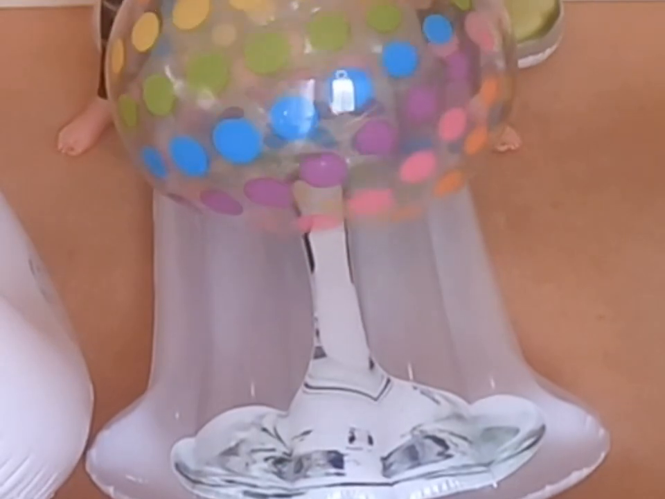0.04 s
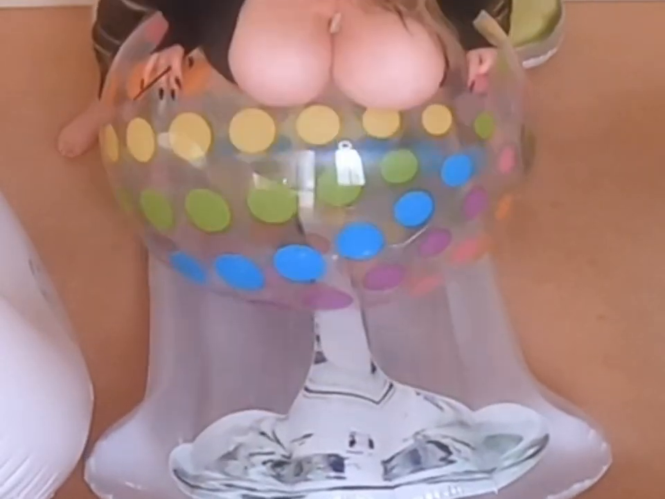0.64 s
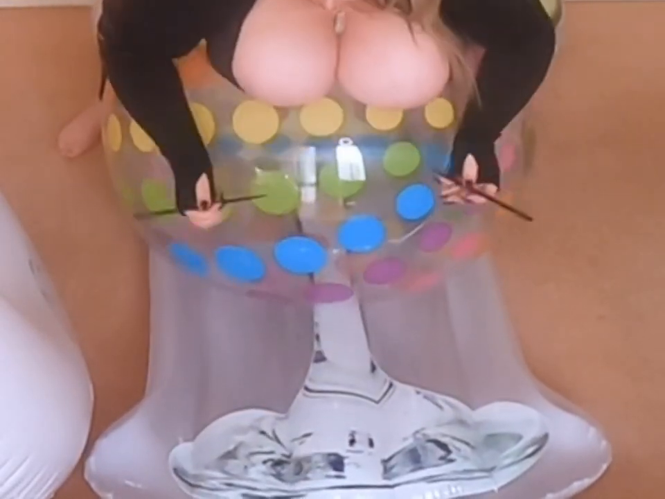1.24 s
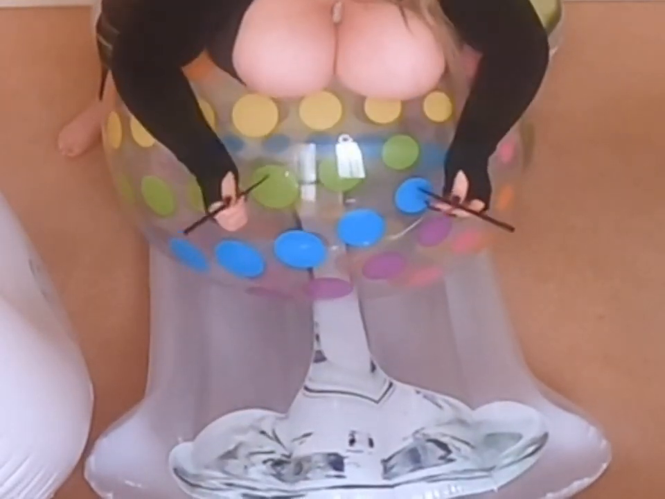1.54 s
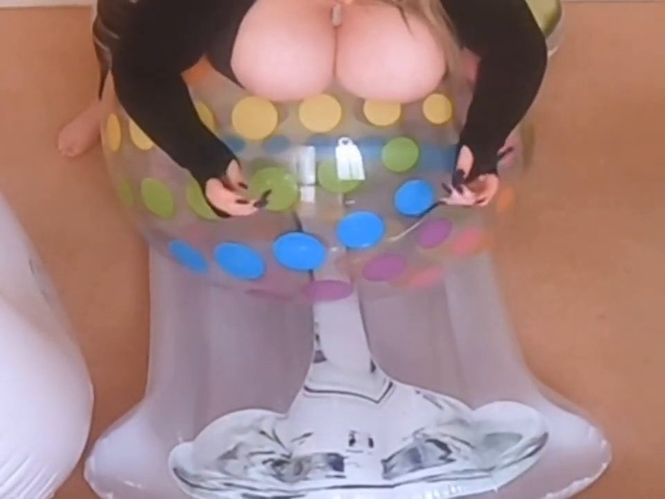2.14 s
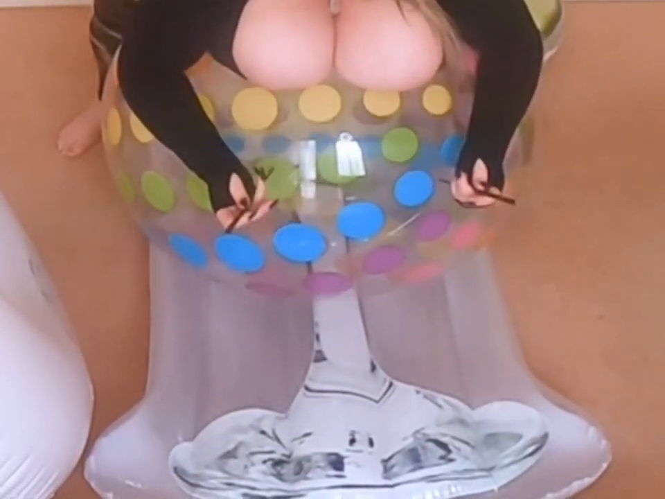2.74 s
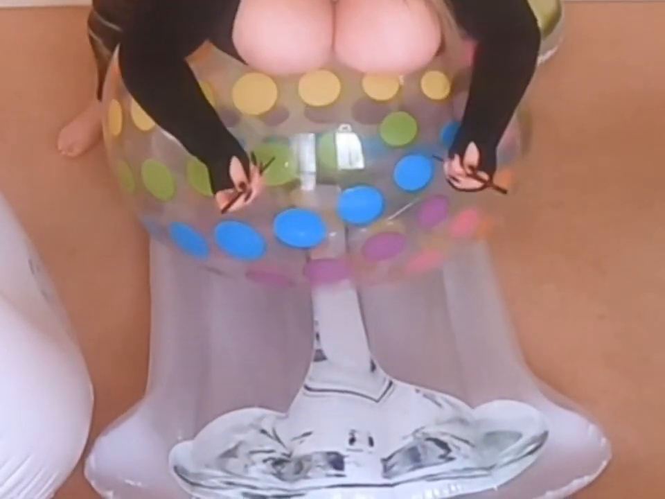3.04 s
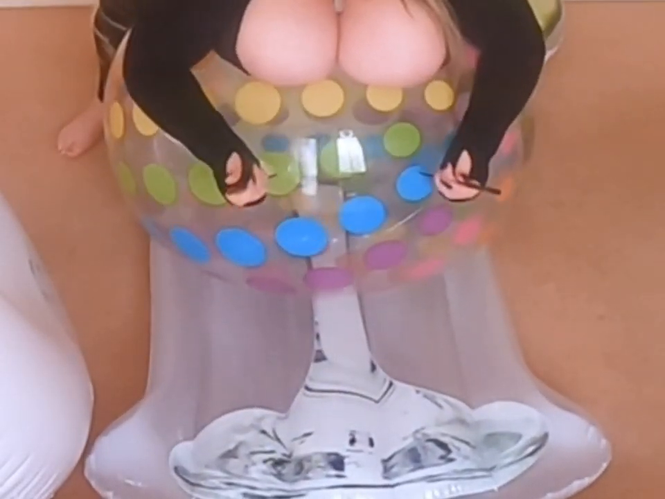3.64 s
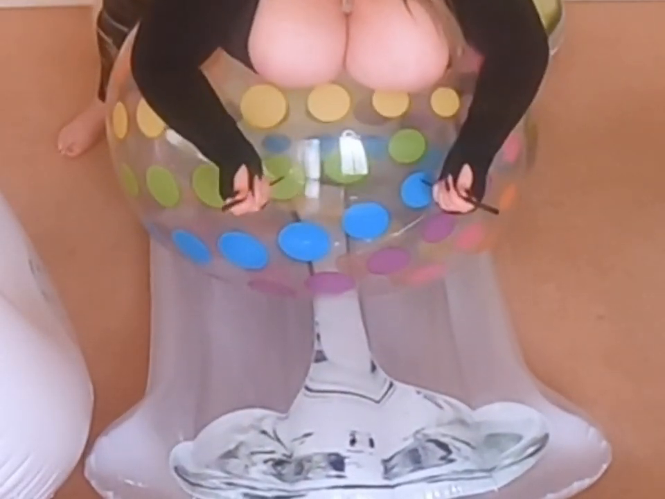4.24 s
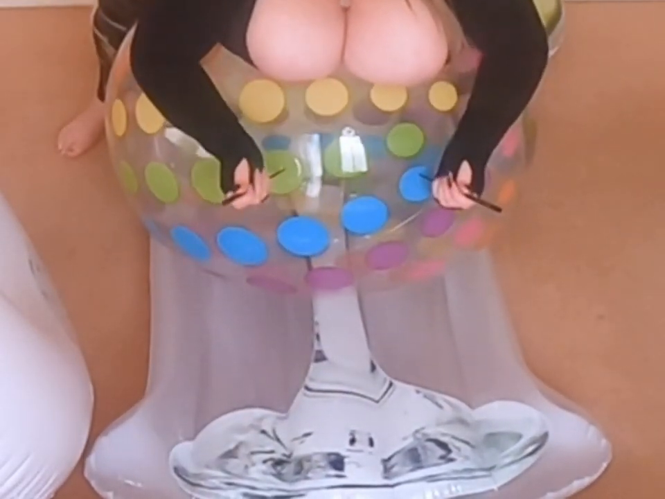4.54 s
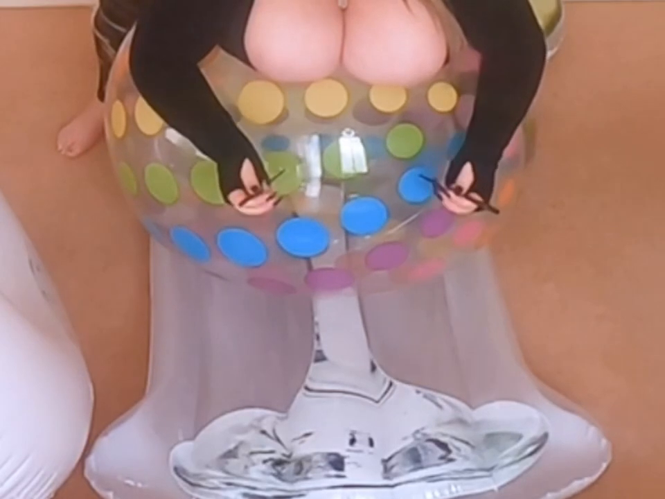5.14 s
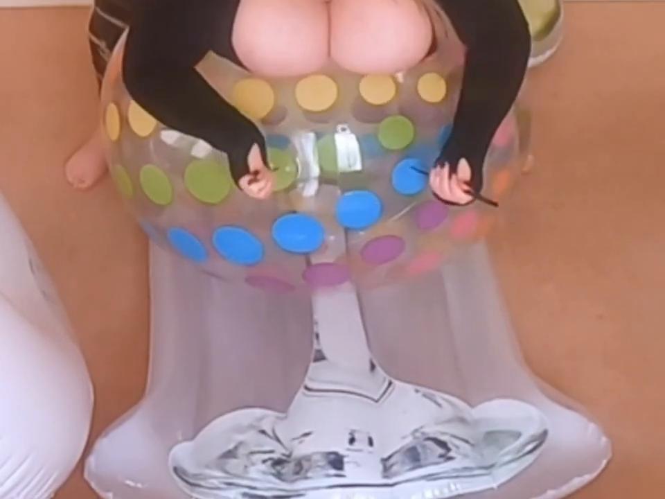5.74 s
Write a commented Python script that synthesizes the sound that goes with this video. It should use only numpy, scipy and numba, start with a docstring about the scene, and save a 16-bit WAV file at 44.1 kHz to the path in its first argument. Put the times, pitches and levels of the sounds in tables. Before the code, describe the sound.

In a small room, a close microphone picks up sticks and hands rubbing an inflated vinyl ball, rasping and faintly squeaking. Bouncing taps come early, and a single hard slap with a hollow boom lands about halfway. The scraping goes on softly until a very loud, slightly distorted double strike and a few lighter jabs, ending in another rasp.

```python
"""A dry rasp with thin squeaks comes first: two chopsticks dragged over a big, taut vinyl inflatable
in a small hard room. Stick-slip friction makes the tips rasp and the skin creak under the hands.
Now and then a jab excites the skin impulsively, and the modes of the enclosed air answer with a boom.
The hardest jabs overload the microphone."""
import sys
import numpy as np
from scipy import signal
from scipy.fft import rfft, irfft
from scipy.io import wavfile
from scipy.ndimage import uniform_filter1d
from numba import njit

SR = 44100
rng = np.random.default_rng(int(sys.argv[2]) if len(sys.argv) > 2 else 0)


def to_wav(sig):
    """Store sig (one row per channel, or 1-D mono) as 16-bit WAV at the path in sys.argv[1].

    Samples outside -1..1 are clipped; the rate is SR.
    """
    pcm = np.clip(np.atleast_2d(sig), -1, 1) * 32767
    pcm = np.round(pcm).astype(np.int16)
    wavfile.write(sys.argv[1], SR, pcm.T)  # frames by channels


N = 263277
T = np.arange(N) / SR
RING_T = T[:SR]  # one second for an event to die away


def undb(db):
    """Decibels to amplitude ratio."""
    return 10 ** (np.asarray(db) / 20)


def unit(x):
    """Normalisation to rms 1."""
    return x / np.sqrt(np.mean(x ** 2))


def fade(t60_s):
    """Free exponential decay, 60 dB in t60_s."""
    return np.exp(-np.log(1000) * RING_T / t60_s)


def build_up(rise_s):
    """First-order growth from 0 towards 1."""
    return 1 - np.exp(-RING_T / rise_s)


def swell(peak_s, rise_s, fall_s):
    """Amplitude envelope of one movement: it builds to a crest of 1 and eases off."""
    away = np.maximum((peak_s - T) / rise_s, (T - peak_s) / fall_s)
    return np.exp(-np.abs(away) ** 1.4)  # exponent 1 gives a pointed crest, 2 a round one


def octaves(size):
    """Logarithmic frequency: octaves above 1 kHz of each spectral bin."""
    return np.log2(np.maximum(np.fft.rfftfreq(size, 1 / SR), 1) / 1000)


def response(points, size):
    """Magnitude response through (frequency_hz, level_db) points."""
    hz, db = np.transpose(points)
    return undb(np.interp(octaves(size), np.log2(hz / 1000), db))


def colour(x, points):
    """Spectral shaping by a magnitude response, at rms 1."""
    return unit(irfft(rfft(x) * response(points, len(x)), len(x)))


def cut(x, order, edge_hz, keep):
    """Maximally flat filter that keeps the "low" or the "high" side."""
    return signal.sosfilt(signal.butter(order, edge_hz, keep, fs=SR, output="sos"), x)


def add(out, start_s, x):
    """Superposition of x on out from start_s."""
    i = int(start_s * SR)
    out[i:i + len(x)] += x[:N - i]


def walk(rate_hz):
    """Slow random modulation at rms 1."""
    hold = max(int(SR / rate_hz), 1)
    steps = np.repeat(rng.standard_normal(N // hold + 1), hold)
    return unit(uniform_filter1d(steps, hold)[:N])


@njit
def band_pass(x, hz, width_hz):
    """Second-order resonator with a moving centre frequency."""
    y, band_state, low_state = np.empty(len(x)), 0., 0.
    for i in range(len(x)):
        tuning, damping = np.tan(np.pi * hz[i] / SR), width_hz / hz[i]
        band = (band_state + tuning * (x[i] - low_state)) / (1 + tuning * (tuning + damping))
        band_state = 2 * band - band_state
        low_state += 2 * tuning * band
        y[i] = damping * band
    return y


def resonance(x, hz, width_hz):
    """Forced vibration of two resonators in cascade, each width_hz wide, at rms 1."""
    return unit(band_pass(band_pass(x, hz, width_hz), hz, width_hz))


def slips(rate_hz, spread_db):
    """Stick-slip friction: a contact releases in impulses of random time and size."""
    sizes = undb(spread_db * np.minimum(rng.exponential(size=N), 5))
    return (rng.random(N) < rate_hz / SR) * sizes * rng.standard_normal(N)


def room(x, wet_db, t60_s=.45):
    """Reverberation: direct sound plus the diffuse field from the walls."""
    tail = rng.standard_normal(SR) * fade(t60_s) * (RING_T > .004)
    return x + undb(wet_db) * signal.fftconvolve(x, tail / np.linalg.norm(tail))[:N]


# spectrum of the quiet room: frequency_hz, density_db
AMBIENT_SPECTRUM = [(25, -39), (70, -11.5), (130, -8.5), (210, 4.5), (320, -0.5), (480, -6), (1000, 1.5),
                    (4000, -18.5), (11000, -31.5), (16000, -45)]


def background():
    """Ambient noise: a low room sound whose level wavers slightly."""
    return colour(rng.standard_normal(N), AMBIENT_SPECTRUM) * undb(-43.5 + 2 * walk(7.5))


# weight shifts onto the skin: peak_s, rise_s, fall_s, level_db, pitch_hz, glide_hz_per_s, width_hz
LEANS = [(.36, .07, 0.06, -35, 660, -800, 300), (.52, .12, .2, -31, 533, -80, 90),
         (.65, 0.2, 0.18, -29, 400, -400, 360), (1.23, 0.08, 0.13, -28, 508, -60, 80)]


def groan():
    """Forced resonance: dragging arms drive a hollow tone that sinks as the dent deepens."""
    out = np.zeros(N)
    waver = 1 + .05 * walk(14)
    friction = slips(rate_hz=2000, spread_db=2)
    for peak_s, rise_s, fall_s, db, hz, glide, width_hz in LEANS:
        pitch = (hz + glide * np.clip(T - peak_s, -2 * rise_s, fall_s)) * waver
        out += undb(db) * resonance(friction, pitch, width_hz) * swell(peak_s, rise_s, fall_s)
    return out


# a tip runs evenly and sings: middle_s, half_length_s, pitch_hz, glide_hz_per_s, level_db
SQUEAKS = [(0.1, 0.22, 4000, -900, -43), (0.12, 0.1, 1700, -400, -39), (0.245, 0.085, 1590, -400, -36),
           (1.7, 0.2, 1690, 0, -44), (2.14, 0.12, 1410, 300, -37.5), (2.29, 0.13, 1665, 400, -38),
           (2.56, 0.13, 1660, 600, -41), (2.748, 0.074, 1496, 0, -37.5), (2.743, 0.061, 1740, 0, -42)]


def squeaks():
    """Narrow-band resonance: under even friction a gliding ring rises out of the scrape."""
    out = np.zeros(N)
    waver = 1 + .016 * walk(13)
    friction = rng.standard_normal(N)
    for middle_s, half_s, hz, glide, db in SQUEAKS:
        pitch = (hz + glide * np.clip(T - middle_s, -half_s, half_s)) * waver
        envelope = np.exp(-((T - middle_s) / half_s) ** 2)
        out += undb(db) * envelope * resonance(friction, pitch, width_hz=.1 * hz)
    return out


# unbroken sliding of the tips: time_s, level_db, centre_hz
SLIDING = [(0, -38.5, 1440), (.67, -31, 1260), (.85, -36.5, 1310), (1.002, -29, 1290), (1.5, -32, 1090),
           (1.72, -44, 1350), (1.97, -48, 1410), (2.14, -36.5, 1170), (3.05, -34.5, 1520),
           (3.5, -37.5, 1120), (4.25, -37.5, 1220), (4.45, -42.5, 1200), (5.15, -43, 1150),
           (5.96, -43, 1600)]


def scrape():
    """Broad resonance: a sliding tip excites the stick, which is too thin to radiate low notes."""
    time_s, *columns = np.transpose(SLIDING)
    db, centre_hz = (np.interp(T, time_s, column) for column in columns)
    friction = room(slips(rate_hz=4000, spread_db=-.7), wet_db=-8)
    friction = cut(friction, order=4, edge_hz=603, keep="high")
    return resonance(friction, centre_hz, width_hz=1320) * undb(db)


# a hand pushes a stick over the skin: peak_s, rise_s, fall_s, rasp_db, drag_offset_db, hiss_offset_db
STROKES = [(0.02, 0.17, 0.33, -31, -10.5, -12.5), (0.42, 0.18, 0.61, -46, 14.5, 4.5),
           (0.79, 0.04, 0.041, -41.5, 16.5, -1), (0.655, 0.13, 0.15, -28.5, 4.5, -13.5),
           (1.17, 0.29, 0.16, -29, -1.5, -12), (1.22, 0.11, 0.13, -32.5, 6.5, 0),
           (1.39, 0.28, 0.15, -39, 10.5, 0.5), (2.3, 0.16, 0.37, -47, 12.5, 0),
           (2.57, 0.1, 0.21, -40, 2, -27), (2.93, 0.077, 0.12, -36.5, 0, -14),
           (3.14, 0.13, 0.081, -35, -2, -12), (3.61, 0.08, 0.21, -43.5, 3, -8.5),
           (3.77, 0.028, 0.046, -36.5, 0.5, -10.5), (3.96, 0.13, 0.13, -39.5, 4, -12),
           (4.22, 0.17, 0.13, -42, 6.5, -5), (4.68, 0.096, 0.1, -44.5, -23, -12),
           (5.43, 0.16, 0.2, -43, 2.5, -8.5), (5.69, 0.087, 0.12, -31.5, 3.5, -20),
           (5.88, 0.18, 0.088, -27.5, -7.5, -11), (5.96, 0.081, 0.13, -35.5, 2, 0)]


def stroke_gains():
    """Incoherent addition: overlapping strokes sum in power, for each of drag, rasp and hiss."""
    power = undb([[-60], [-55.5], [-63.5]]) ** 2  # friction of the resting hands
    for peak_s, rise_s, fall_s, db, drag_db, hiss_db in STROKES:
        crests = undb([[db + drag_db], [db], [db + hiss_db]])
        power = power + (crests * swell(peak_s, rise_s, fall_s)) ** 2
    return np.sqrt(power)


# spectra of the low drag, the middle rasp and the high hiss: frequency_hz, density_db
DRAG_SPECTRUM = [(25, -97), (70, -70), (120, -15.5), (200, -1.5), (330, 2), (450, -1.5), (650, -1),
                 (950, -5.5), (1600, -19.5), (5000, -28.5), (16000, -97)]
RASP_SPECTRUM = [(200, -18.5), (1200, -5), (2200, 0.5), (3100, -4.5), (4400, -7), (5600, -17), (8000, -33),
                 (16000, -57)]
HISS_SPECTRUM = [(500, -13), (3500, -5.5), (6000, -5), (8000, -11.5), (11000, -19.5), (13000, -38),
                 (16000, -54)]


def rubbing():
    """Stick-slip of tips and hands: the skin drags and drives the air inside, the tips rasp and hiss."""
    drag_gain, rasp_gain, hiss_gain = stroke_gains()
    friction = room(slips(rate_hz=6000, spread_db=.5), wet_db=-3.5)
    grip = walk(45)  # its unsteadiness is felt most in the heavy drag
    skin = colour(friction * undb(2 * grip), DRAG_SPECTRUM)
    air = unit(signal.fftconvolve(skin, air_ring(swell_s=.0073))[:N])
    drag = unit(skin + undb(-11) * air)
    rasp = colour(friction * undb(.7 * grip), RASP_SPECTRUM)
    # the finest slips run together into a smooth hiss
    hiss = colour(rng.standard_normal(N), HISS_SPECTRUM) * undb(1.3 * walk(60))
    return drag * drag_gain + rasp * rasp_gain + hiss * hiss_gain


# a tip catches and skips: start_s, level_db, decay_s
SKIPS = [(0.958, -36, 0.018), (0.99, -45, .005), (1.178, -29, .012), (3.756, -41.5, 0.032),
         (3.87, -36, .003), (3.88, -37, 0.0037), (4.123, -41.5, .025), (4.244, -38, 0.028)]
# spectrum of a skip: frequency_hz, density_db
SKIP_SPECTRUM = [(100, -38), (1000, 2), (3500, 9), (6000, 2), (9500, 1), (12000, -11), (16000, -28)]


def skips():
    """Friction transients: where a tip catches, its slips merge into a short, bright burst of noise."""
    envelope = np.zeros(N)
    for start_s, db, decay_s in SKIPS:
        add(envelope, start_s, undb(db) * np.exp(-RING_T / decay_s))
    return room(envelope * colour(rng.standard_normal(N), SKIP_SPECTRUM), wet_db=-5)


# modes of the inflatable and the air inside it: pitch_hz, level_db, t60_s
AIR_MODES = [(122, -15, .22), (189, -8.5, .32), (218, -3, .32), (251, -10, .26), (320, -.5, .32),
             (347, -9, .24), (428, -14, .3), (446, -11, .3), (495, -3, .31), (567, -10, .26),
             (698, -13, .27), (730, -12, .28), (798, -13, .28), (997, -18, .3), (1181, -17, .33),
             (1990, -21, .35), (2321, -21, .35), (2671, -21, .35)]


def air_ring(swell_s):
    """Normal modes: the enclosed air takes up the skin's motion; each dent shifts pitches and phases."""
    chance = rng.uniform(-1, 1, (len(AIR_MODES), 2))
    ring = np.zeros(SR)
    for (hz, db, t60_s), (detune, phase) in zip(AIR_MODES, chance):
        pitch = hz * (1 + .004 * detune)
        ring += undb(db) * fade(t60_s) * np.sin(2 * np.pi * pitch * RING_T + np.pi * phase)
    return ring * build_up(swell_s)


# soft pushes on the skin: start_s, level_db, rise_s, cutoff_hz
NUDGES = [(0, -30.5, 0.003, 1500), (0.88, -22, .006, 600), (0.964, -22.5, 0.0052, 600),
          (1.166, -9, 0.013, 400), (1.224, -20, .008, 240), (1.455, -28, 0.0041, 400),
          (2.119, -27.5, 0.0037, 800), (2.37, -33.5, 0.0052, 800), (2.865, -24, 0.0058, 600),
          (2.885, -28, 0.0044, 600), (3.577, -42, 0.0046, 800), (3.757, -47, 0.0066, 1500),
          (3.876, -28, .006, 800), (4.214, -34, .006, 800), (4.298, -35, 0.0078, 800),
          (4.385, -31.5, 0.0054, 600), (5.065, -23, 0.01, 300), (5.101, -27, 0.0068, 280),
          (5.45, -8, .008, 230)]
# spectrum of their thud: frequency_hz, density_db
THUD_SPECTRUM = [(25, -46), (70, -18.5), (122, -6), (260, -4.5), (480, -6), (1500, -11), (16000, -58)]


def nudges():
    """Low-frequency excitation: a soft push moves only the low modes and gives a dull thud."""
    out = np.zeros(N)
    for start_s, db, rise_s, cutoff_hz in NUDGES:
        ring = cut(air_ring(rise_s), order=2, edge_hz=300, keep="low")
        thud = colour(rng.standard_normal(SR), THUD_SPECTRUM) * fade(.27) * build_up(rise_s)
        push = cut(thud + undb(-6) * ring, order=2, edge_hz=cutoff_hz, keep="low")
        add(out, start_s, undb(db) * push)
    return out


# a tip bounces on the skin: start_s, level_db, pitch_hz
BOUNCES = [(0.881, -12, 800), (0.9232, -7, 600), (1.185, -11, 1300), (1.1995, -6, 650), (1.2128, -8, 900),
           (1.301, -15, 600)]


def bounces():
    """Heavily damped oscillation: each rebound after a glancing jab knocks for about one cycle."""
    out = np.zeros(N)
    for start_s, db, hz in BOUNCES:
        cycles = hz * RING_T
        add(out, start_s, undb(db) * np.sin(2 * np.pi * cycles) * np.exp(-cycles))
    return room(cut(out, order=2, edge_hz=110, keep="high"), wet_db=-4)


# spectrum of a tip meeting the vinyl: frequency_hz, density_db
TICK_SPECTRUM = [(25, -43), (500, 20), (2200, 3), (5000, -19), (10000, -19.5), (16000, -67)]


def tick(decay_s):
    """Contact transient: a sharp push on the skin and its recoil, as a minimum-phase pulse."""
    log_gain = np.log(response(TICK_SPECTRUM, SR))
    # keeping only the early half of the cepstrum makes the pulse start abruptly
    cepstrum = irfft(log_gain, SR) * (np.sign(.5 - RING_T) + np.sign(RING_T))
    pulse = irfft(np.exp(rfft(cepstrum)), SR) * np.exp(-RING_T / decay_s)
    return pulse / np.abs(pulse).max()


# bands of the slapped skin with its reverberation: frequency_hz, density_db, t60_s
SLAP_BANDS = [(25, -53, 0.24), (69.5, -15, 0.48), (146, -1, 0.27), (263, 3, 0.35), (520, 2.5, 0.38),
              (1060, -4.5, 0.41), (1530, -9, 0.41), (2100, -10, 0.39), (3020, -14.5, 0.39),
              (4660, -18, 0.4), (5280, -27, 0.41), (9950, -41.5, 0.54), (16000, -63, 0.15)]


def slap(tilt_db, contact_s, zing_hz, bass_lag_s):
    """Modal overlap: skin and room ring as noise; each band dies at its own rate, the bass rises last."""
    hz, db, t60 = np.transpose(SLAP_BANDS)
    band_octaves = np.log2(hz / 1000)
    tilted_db = db + tilt_db * np.clip(band_octaves, -2, None)
    spectrum = rfft(colour(rng.standard_normal(SR), np.c_[hz, tilted_db]))
    # the tension at the struck spot favours the region around zing_hz
    detune = np.fft.rfftfreq(SR, 1 / SR) / zing_hz - 1
    spectrum *= undb(5 / (1 + (detune / .16) ** 2))
    out = np.zeros(SR)
    for share, band_hz, t60_s in zip(np.eye(len(hz)), hz, t60):
        band = irfft(spectrum * np.interp(octaves(SR), band_octaves, share), SR)
        rise_s = contact_s + bass_lag_s / (1 + (band_hz / 250) ** 2)
        out += band * fade(t60_s) * build_up(rise_s)
    return out


def dent_ring(hz, swell_s, flat_share=.25, recover_s=.03):
    """Tension modulation: the dented patch wobbles briefly, rising in pitch as it springs back taut."""
    pitch = hz * (1 - flat_share * np.exp(-RING_T / recover_s))
    phase = 2 * np.pi * (np.cumsum(pitch) / SR + rng.random())
    return 2 * np.sin(phase) * fade(t60_s=.19) * build_up(swell_s)


# a stick strikes the skin: start_s, level_db, tilt_db_per_octave, contact_s, boom_offset_db,
# zing_hz, dent_hz, dent_offset_db, swell_s
JABS = [(0.8688, -17.5, -1.7, .0001, -12, 1300, 420, -9, .008),
        (0.8995, -23, -1.5, .0005, -4.5, 900, 330, -8, .012),
        (0.921, -19.5, -5, .0012, -9, 605, 320, -3, .008),
        (0.962, -31.5, 7, .0005, -6, 4400, 400, -6, .008), (1.036, -29, -3, .001, -10, 600, 560, -4, .012),
        (1.141, -18.5, -3.5, .003, -10, 528, 480, -5, .012),
        (1.179, -15.5, 1.2, .0012, -14, 620, 520, -7, .012),
        (2.115, -33, -3, .005, -10, 600, 400, -8, .012), (2.858, -32, -2, .005, -10, 600, 220, -4, .012),
        (3.1563, -1, -.1, .0003, 0, 4600, 760, -4, .018),
        (5.426, 2.5, 2.1, .0036, -12, 2400, 520, -6, .014), (5.462, -4, 1.5, .008, 4.5, 2000, 350, 5, .012),
        (5.55, -22, 6, .006, 4, 2400, 335, 3, .01), (5.691, -21, 0, .0033, -4, 1310, 400, -1, .008),
        (5.7025, -11, 1.7, .0016, -9, 1300, 430, -1.5, .003),
        (5.733, -17, -2, .004, 4.5, 760, 290, 5.5, .004)]


def jabs():
    """Impulse excitation: a tick and a slap, then the dent wobbles and the air inside booms."""
    out = np.zeros(N)
    for start_s, db, tilt_db, contact_s, boom_db, zing_hz, dent_hz, dent_db, swell_s in JABS:
        hardness = 1 / (1 + contact_s / .0025)  # short contacts tick the most
        tick_db = -.5 + .29 * db  # the tick grows more slowly than the rest of the jab
        add(out, start_s, undb(tick_db) * hardness * tick(decay_s=.0028))
        crack = slap(tilt_db, contact_s, zing_hz, bass_lag_s=.7 * swell_s)
        boom = undb(boom_db) * air_ring(swell_s)
        wobble = undb(dent_db) * dent_ring(dent_hz, swell_s)
        add(out, start_s, undb(db) * (crack + boom + wobble))
    return out


def scene():
    """Superposition: all sounds of the inflatable and the room meet at one close microphone."""
    impacts = jabs() + bounces() + nudges()
    friction = skips() + rubbing() + scrape() + squeaks() + groan()
    return (impacts + friction + background())[None]


def record(dry, top_hz=15900):
    """Hard clipping and band limiting: the loudest blows overload, and a steep low-pass cuts the top."""
    clipped = np.clip(dry, -1, 1)
    return signal.sosfilt(signal.ellip(10, .1, 70, top_hz, fs=SR, output="sos"), clipped)


dry = scene()
out = record(dry)
to_wav(out)
```